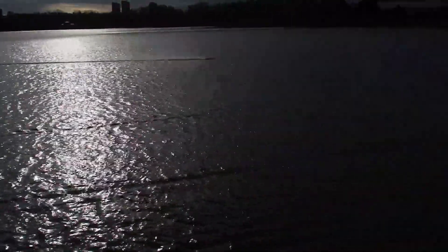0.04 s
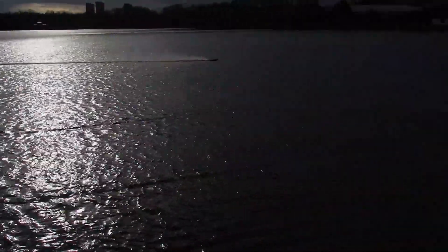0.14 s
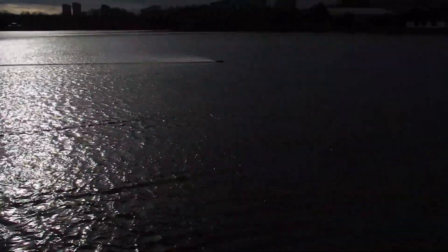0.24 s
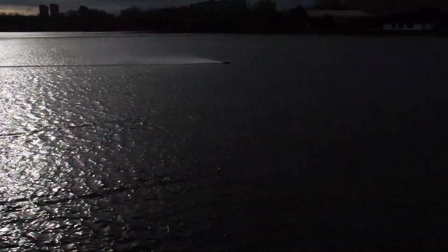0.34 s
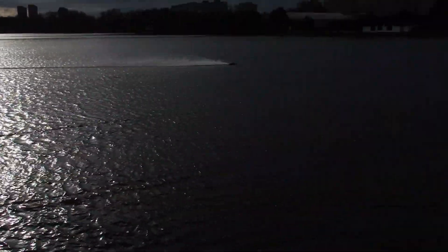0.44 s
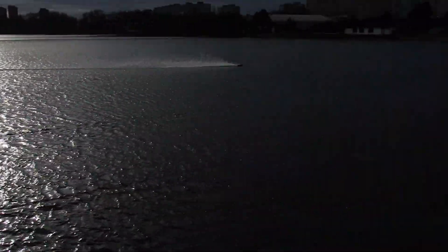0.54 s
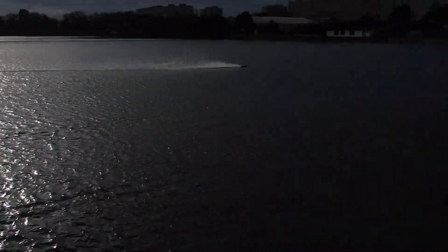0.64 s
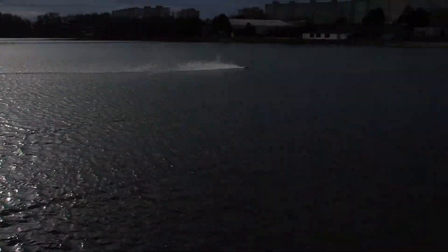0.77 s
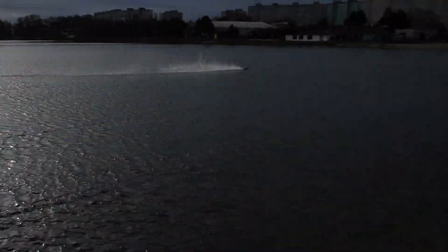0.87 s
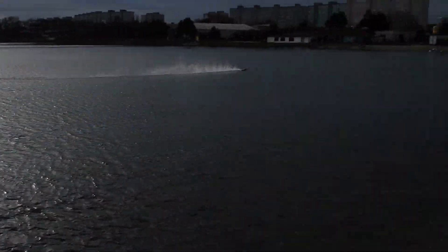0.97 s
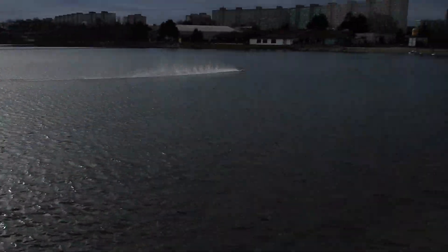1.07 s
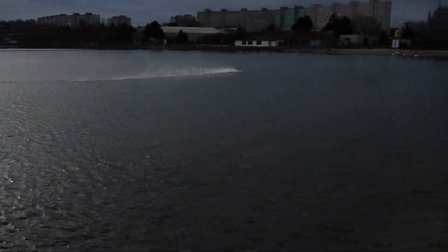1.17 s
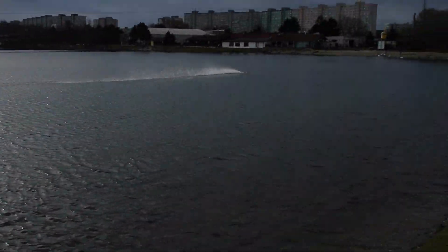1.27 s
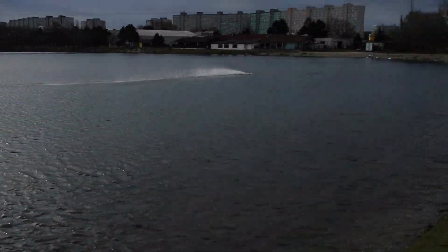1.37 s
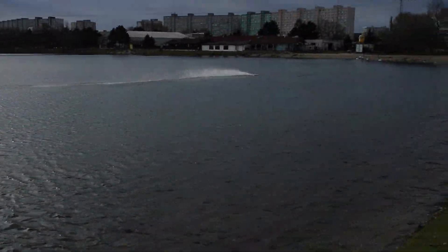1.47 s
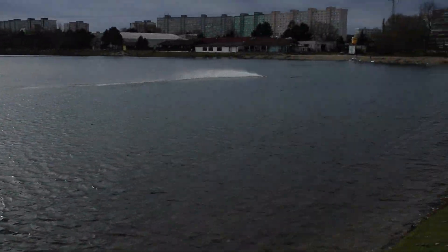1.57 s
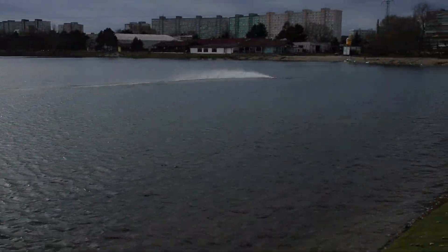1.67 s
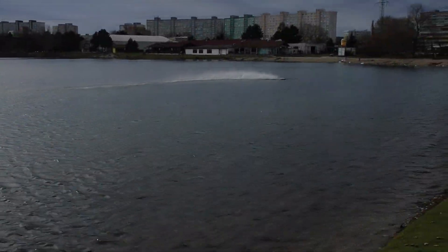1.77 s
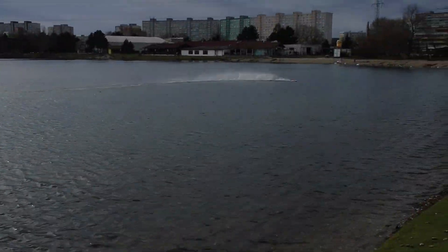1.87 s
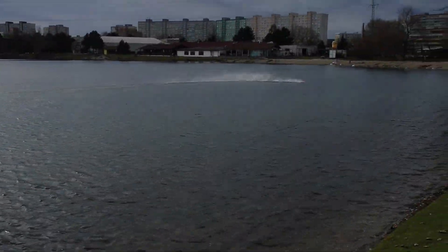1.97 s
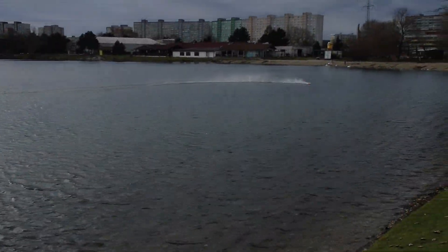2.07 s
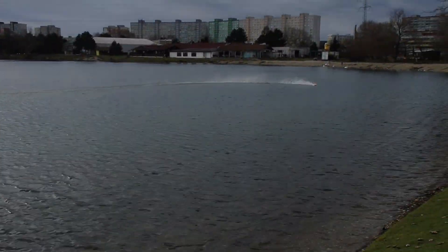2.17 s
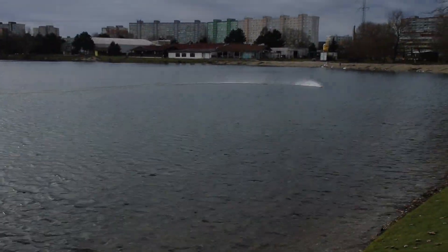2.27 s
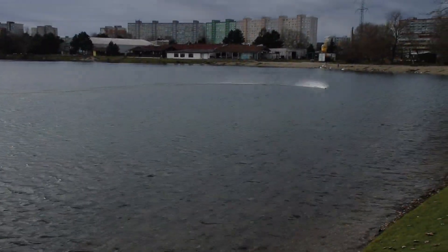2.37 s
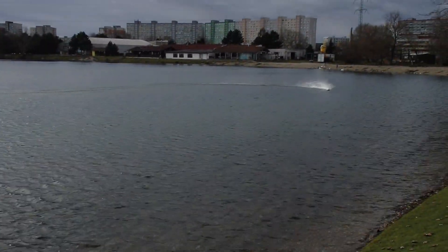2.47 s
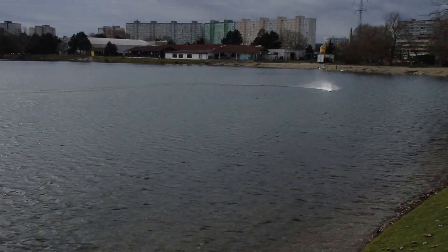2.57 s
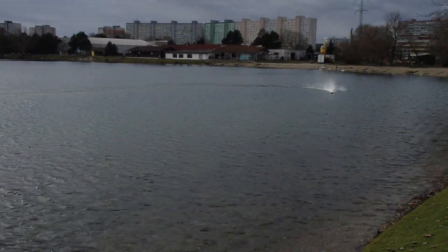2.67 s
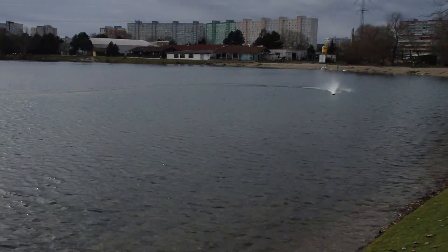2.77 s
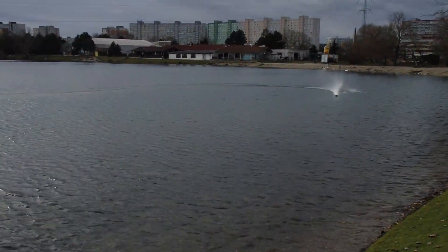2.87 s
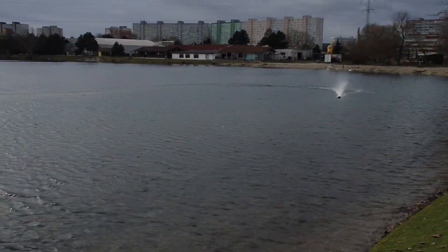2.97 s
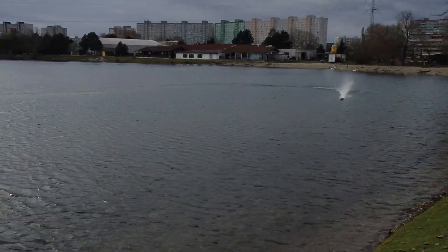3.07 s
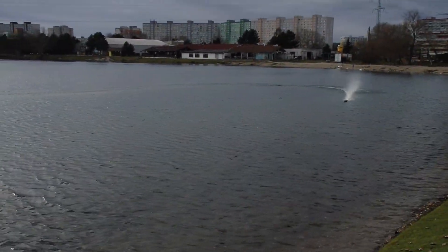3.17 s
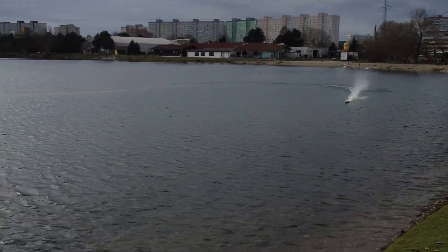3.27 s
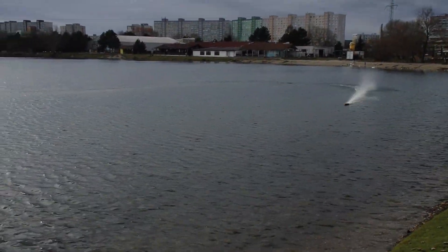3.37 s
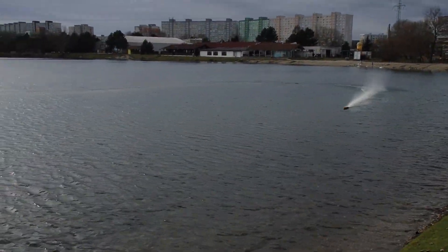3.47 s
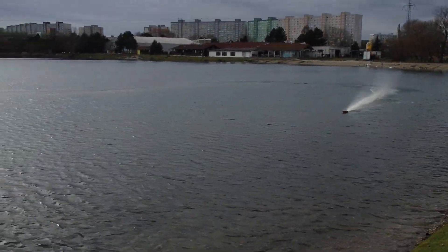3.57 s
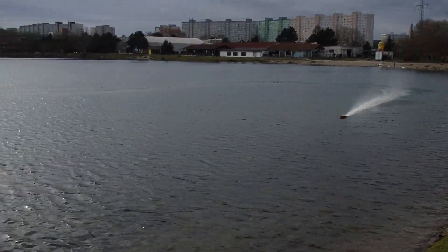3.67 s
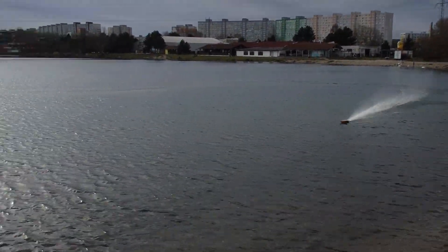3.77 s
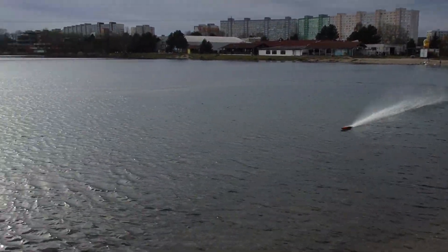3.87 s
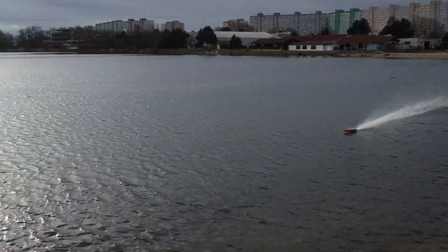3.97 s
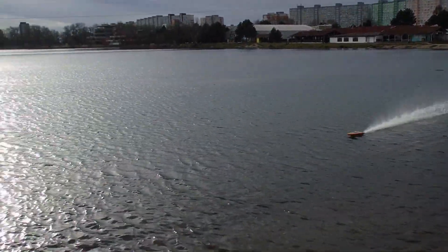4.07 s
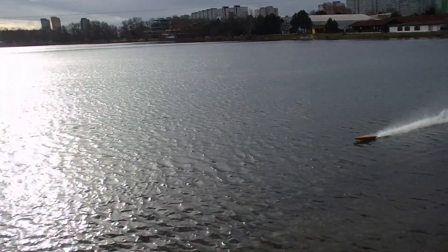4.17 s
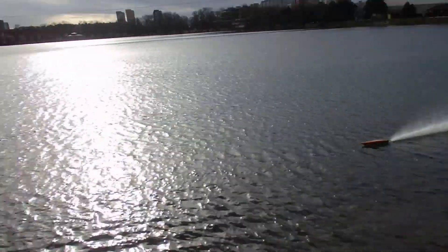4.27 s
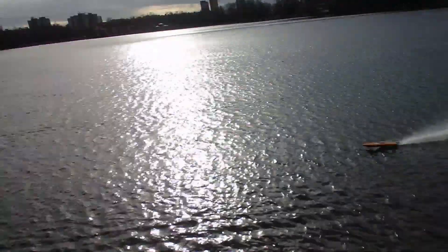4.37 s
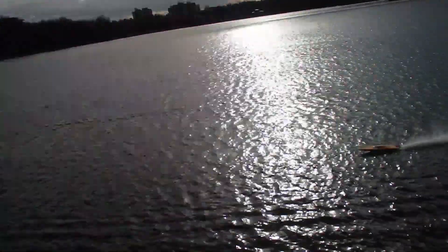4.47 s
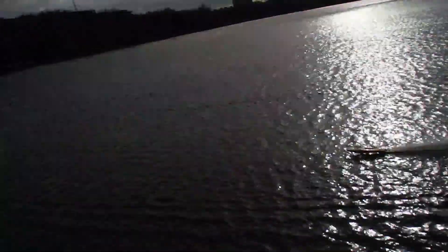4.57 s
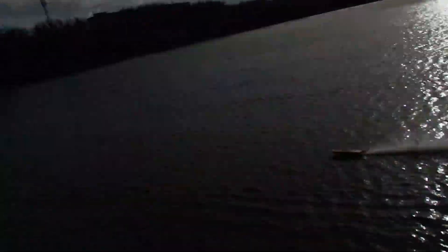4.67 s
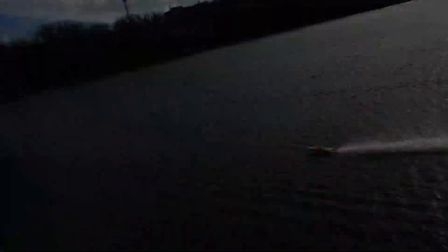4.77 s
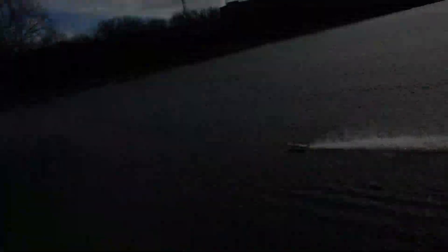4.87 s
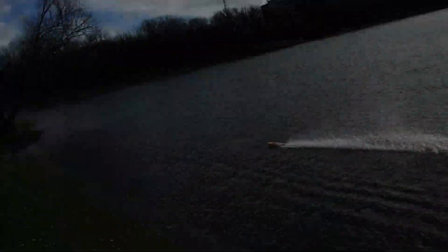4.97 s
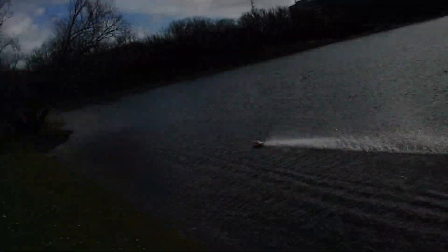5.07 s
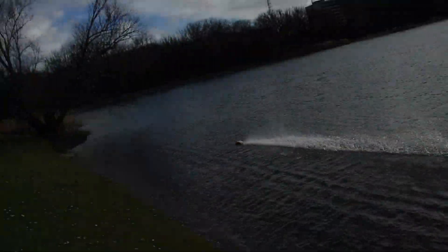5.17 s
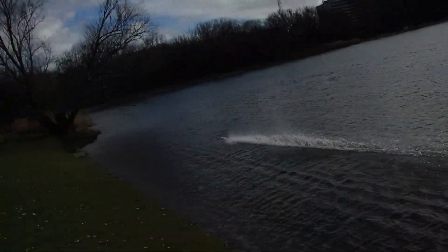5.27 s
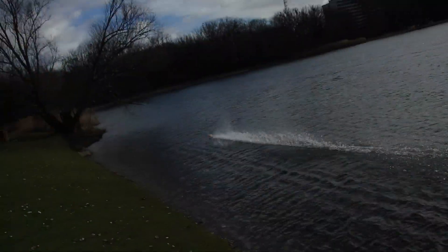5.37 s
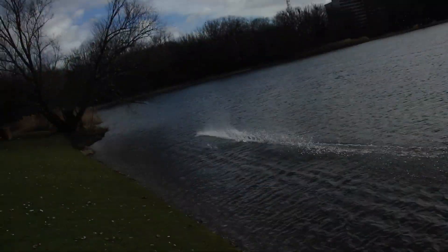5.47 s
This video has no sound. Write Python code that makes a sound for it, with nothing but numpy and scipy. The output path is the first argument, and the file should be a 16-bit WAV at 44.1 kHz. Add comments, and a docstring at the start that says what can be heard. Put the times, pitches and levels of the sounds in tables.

```python
"""An electric model speedboat crosses a lake, throttles back for a turn, then races past near the shore.
Its two-bladed surface propeller whines at harmonics of the blade rate, clean while it bites and ragged
when the hull skips. The strokes fling up a hissing tail of spray, and the banks return faint echoes.
A turbulent breeze bumps the two microphone ports, of which the right is muffled, over a soft hiss."""
import sys
import numpy as np
from scipy import signal
from scipy.fft import rfft, irfft
from scipy.io import wavfile
from scipy.ndimage import uniform_filter1d, minimum_filter1d

SR = 44100
rng = np.random.default_rng(int(sys.argv[2]) if len(sys.argv) > 2 else 0)


def materialize(psi):
    """Save the field psi as 16-bit PCM at rate SR to the path in sys.argv[1].

    A 1-D psi becomes a single channel; in a 2-D psi each row is a channel.
    """
    bounded = np.clip(np.atleast_2d(psi).T, -1, 1)
    quanta = np.round(bounded * 32767).astype(np.int16)
    wavfile.write(sys.argv[1], SR, quanta)


N = 243431
TIME = np.arange(N) / SR
FREQS = np.arange(N // 2 + 1) * SR / N

# Blade strokes per second, Doppler shift included: (time [s], rate [Hz])
BLADE_RATE = [(0, 995), (.45, 958), (.8, 925), (1.05, 917), (1.22, 930), (1.5, 920), (1.92, 914),
              (1.99, 966), (2.025, 958), (2.05, 765), (2.17, 535), (2.33, 527), (2.42, 596), (2.48, 735),
              (2.6, 880), (2.7, 932), (3.25, 985), (3.33, 1008), (3.55, 1004), (3.85, 1015), (4.45, 1017),
              (4.55, 1001), (4.66, 1002), (4.75, 972), (4.85, 967), (5.02, 936), (5.12, 938), (5.25, 923),
              (5.52, 921)]
# Odd shaft harmonics from unequal blades: (multiple of shaft rate [1], relative level [dB])
IMBALANCE_TONES = [(1, -17), (3, 0), (5, -1), (7, -10), (11, -11)]
# Loudness of the boat as it runs out, turns and passes close: (time [s], level [dB])
NEARNESS = [(0, -35.5), (.3, -38.5), (.85, -41.5), (1.6, -42), (2.3, -46), (2.8, -46), (3.25, -42),
            (3.7, -37), (4.1, -32.5), (4.4, -26), (4.63, -25), (4.9, -25), (5.25, -27), (5.52, -31)]
# Side the boat shows, 0 bow, 90 abeam, 180 stern: (time [s], angle [deg])
HEADING = [(0, 144), (1, 155), (1.7, 180), (2.05, 175), (2.5, 98), (3, -3), (3.5, 20), (4.2, 54),
           (4.62, 100.5), (4.9, 135.5), (5.52, 128)]
# Radiation of the whine: (angle [deg], blade tones 1 to 6 [dB each], imbalance tones [dB])
DIRECTIVITY = [(0, 9, 3, -10, -5, -1, -2, -1.5), (30.06, 6.5, 9, -6, -12, -3.5, -7.5, -6.5),
               (87.8, 9.5, 1.5, -3.5, -10, -9, -29, -4), (136.8, 4.5, 1, 6, -5.5, -5.5, -16, -12),
               (154.8, 1, 3.5, -8, -7.5, -10, -9, -7), (176, 9, 1.6, -8.5, -12, -14, -13, -7)]
# From astern the whine comes ragged through the spray: (angle [deg], roughness [0-1])
ROUGHNESS = [(0, .12), (40, .06), (90, .06), (132, .08), (142, .33), (180, .42)]
# The propeller slams into a ripple or skips clear: (time [s], swell or dip [dB], Gaussian width [s])
SLAMS = [(0.909, 6.5, 0.0057), (0.946, 8, 0.0032), (0.972, -3, 0.003), (0.976, 13.5, 0.0021),
         (0.991, 7, 0.0073), (1.068, 1, 0.0045), (1.909, 5, 0.0077), (1.98, 6, 0.0039),
         (1.997, 6.5, 0.0045), (2.014, -14, 0.0048), (2.024, 8, 0.0029), (2.101, 14, 0.0071),
         (3.299, 3.5, .012), (3.34, -6, 0.0081), (4.71, -1.5, 0.0072), (4.723, 10.5, 0.0044),
         (4.746, -9, 0.004)]
# The hull skips: (time [s], length [s], spray [dB], wash [dB], whine [dB],
# brightening [dB per blade tone], air drawn in [0-1])
SKIPS = [(-.012, 0.029, -0.5, 6.4, -2.5, 3, 0.46), (0.11, .064, 2, 5, -1.5, 2.5, .05),
         (0.329, 0.055, 4, 1.7, -1, -0.5, 0.19), (0.447, 0.13, 1.5, 4.5, 7, 1.5, 0.33),
         (0.604, .168, 5.5, 6.5, 8.5, 2, .5), (0.909, 0.167, 4, 5.5, 6.5, -0.5, .2),
         (1.16, 0.075, 2.5, 2, 7, 3.5, 0), (1.272, .06, 4.5, -1, 0.5, 8, 0.12),
         (1.351, 0.0901, 2.5, 2.5, 3, 7, .45), (1.452, 0.032, 4, -1.5, 3, 6.5, 0.31),
         (1.965, 0.07, 2.9, 2, 1.5, -2, 0.16), (2.169, .03, 3.5, 6.5, 3, 16, .45),
         (2.461, .065, 2, -1, 4.5, 4, 0.11), (2.556, .06, 2.5, 2.5, 1.5, 0.5, .2),
         (2.711, 0.017, 8, 7.5, 3.5, 5, .55), (2.838, 0.0082, 12, 5, -1, -5, 0.09),
         (2.869, .014, 7.5, 3, 0, -6, .1), (2.95, 0.14, 4.5, 0.5, 0.5, -1.5, 0.05),
         (3.285, 0.042, 5, 1.5, 3, 5, 0.37), (3.35, 0.036, 8.5, 3.5, 1, 2.5, 0.18),
         (3.451, 0.077, 5.5, 2, 1, -0.5, 0.01), (3.621, 0.071, 2.5, -2.5, .5, 0, .02),
         (3.788, 0.045, 4.5, 5, -1, 1.5, 0.09), (4.0, 0.068, 3.5, 5, 1, 0.5, 0.03),
         (4.184, 0.1, 6, 4.7, 1.5, 5, 0.29), (4.381, 0.09, 5.5, 5, 1, 2, 0.08),
         (4.568, .11, 6.5, 6.5, 5, -.5, 0.05), (4.773, 0.109, 6, 4.5, -1, 2, .25),
         (5.004, 0.0559, 6, 6, -3.5, .5, 0.49), (5.08, .06, 4.5, 4, 0, 3.5, 0.07),
         (5.27, 0.063, 4.2, 4, -9.5, 1, 0.63), (5.351, 0.07, 5, 1.5, 0.5, 3, .3),
         (5.49, .04, 6.5, 3, -1.5, -0.5, 0.4)]
# Spectrum of the wash: (frequency [Hz], relative density [dB])
WASH_SPECTRUM = [(150, -32), (350, -14.5), (600, -8), (850, -11), (1100, -0.5), (1300, -2.5), (1600, 1),
                 (2000, 3.5), (2700, 0), (3300, -7.5), (4200, -10.5), (7000, -50)]
# Spectrum of the spray: (frequency [Hz], relative density [dB])
SPRAY_SPECTRUM = [(1500, -18), (3000, 3), (3700, -5), (4400, -2.5), (5100, 4), (5800, 0.5), (6500, -4.5),
                  (7400, -8), (8500, -21), (9600, -10.5), (10500, -17.5), (11800, -33), (13000, -29),
                  (14500, -33)]
# Reflections from the banks: (delay [s], level [dB])
ECHOES = [(.047, -31), (0.111, -27), (.21, -26)]
# How the two ports hear the boat: (frequency [Hz], left minus right [dB], phase lead of left [rad])
PORT_RESPONSE = [(99, 8.5, 2), (546, -10, 0.18), (950, -1, 0.75), (2030, -.3, 0.53), (2800, -3, 1),
                 (3300, 0, 1.61), (4120, 9, 2), (4920, 23, 1), (5000, 31, -4), (6940, 8.5, 15.5),
                 (7340, 17, -66), (7250, 17, 31), (9800, 18, -2), (12000, 1.5, -2), (14500, 5, -1.6)]
# Steady breeze on the ports: (time [s], level [dB])
BREEZE_LEVEL = [(0, -44.5), (.95, -43.5), (1.15, -48.5), (2.3, -47), (2.7, -50), (4.4, -52.5), (5.52, -47)]
# Spectrum of the turbulence: (frequency [Hz], relative density [dB])
BREEZE_SPECTRUM = [(20, -30), (45, -7), (80, 1), (130, 3), (230, 2.5), (350, 1), (550, -2), (1000, -24),
                   (2500, -60)]
# Eddies thump the ports: (time [s], level [dB], left minus right [dB], Gaussian width [s], bass [dB])
EDDIES = [(0.253, -38.5, 13, .016, -5), (.311, -36.5, -18, .007, -3), (0.359, -30, 21, 0.0086, -12),
          (.65, -42.5, 3, 0.057, 2), (0.754, -43, -7, 0.039, -2), (1.384, -32.5, -2, 0.006, -6),
          (1.38, -43, -18, 0.069, 5), (1.446, -26, 2, 0.0035, -4), (1.73, -48, -26, 0.053, 13.5),
          (3.215, -51, -35, 0.0097, 17), (3.322, -54, -14, 0.023, 10), (4.652, -25.5, -4, 0.011, -3),
          (4.675, -26, 9, .016, -9), (4.78, -31.5, -7, .05, -5), (4.902, -30.5, 4, 0.034, -4),
          (5.058, -32, -5, 0.024, -6), (5.329, -42, 15, 0.038, -8)]
# Open air and microphone hiss: (frequency [Hz], relative density [dB])
AIR_SPECTRUM = [(40, -8), (120, -11), (500, 3), (1000, 11), (2500, -35), (5000, -9), (9000, -9),
                (15000, -10)]

SHUT_AT_S, SHUT_S, REOPEN_AT_S, REOPEN_S, IDLE_DB = 2.055, 0.0086, 2.27, 0.34, -15
SLIP_DB, FULL_SLIP_HZ_PER_S, SLIP_FIRST_SHARE = 8, 1100, 0.2
SKIP_ATTACK_S, SKIP_RELEASE_S = 0.022, 0.02
UPPER_BITE_SHARE = 0.38   # share of a skip's swell that the upper tones follow
RACE_HZ = 28.06   # rise of the blade rate with the propeller all in air
SPRAY_DB, WASH_DB, WASH_NEARNESS_SHARE = 0.86, -8.5, 0.7
EDDY_BASS_HZ, CUTOFF_HZ = 111, 15400


def propeller(shaft_phase, rough, level_db, bite_db, bright_db):
    """Periodic forcing: two strokes a turn give even shaft harmonics; unequal blades add odd ones."""
    radiated_db = level_db + np.array(by_heading(DIRECTIVITY))
    first_db, second_db, third_db, fourth_db, fifth_db, sixth_db, odd_db = radiated_db
    slap_db = bite_db + (0.66 + 2.24 * rough) * drift(17)   # ripples change how deep the blades dip
    for at, db, width in SLAMS:
        slap_db += db * np.exp(-0.5 * ((TIME - at) / width) ** 2)
    slip_db = blade_slip()
    first_db += slap_db - bright_db - SLIP_FIRST_SHARE * slip_db
    second_db += slap_db + slip_db
    third_db += slap_db + bright_db
    whine = from_db(first_db) * tone(2 * shaft_phase, 0.13 + 0.69 * rough, width_hz=99, rise_hz=18)
    whine += from_db(second_db) * tone(4 * shaft_phase, 1.9 * rough, width_hz=68, rise_hz=8)
    whine += from_db(third_db) * tone(6 * shaft_phase, 1.54 * rough, width_hz=46)
    upper_db = [fourth_db, fifth_db, sixth_db, sixth_db - 9, sixth_db - 16]
    for order, db in zip([8, 10, 12, 14, 16], upper_db):
        gain = from_db(db + UPPER_BITE_SHARE * bite_db + 2.65 * drift(10))
        whine += gain * tone(order * shaft_phase, 0.26 + 0.63 * rough, width_hz=39)
    for order, db in IMBALANCE_TONES:
        gain = from_db(odd_db + db - 0.3 + 4.1 * drift(10))
        whine += gain * tone(order * shaft_phase, 0.18, width_hz=110)
    return whine


def tone(phase, rough, width_hz, rise_hz=0):
    """Random modulation: uneven strokes move a share of a tone's power into sidebands."""
    sidebands = rms_one(drift(width_hz) + 1j * drift(width_hz))
    sidebands *= np.exp(2j * np.pi * rise_hz * TIME)   # a little sharp where the blades slip
    share = np.clip(rough, 0, 1)
    envelope = np.sqrt(1 - share) + np.sqrt(share) * sidebands
    wander = 2 * drift(0.42)   # the phase turns slowly, at random
    return np.sqrt(2) * np.real(envelope * np.exp(1j * (phase + wander)))


def blade_slip():
    """Slip grows with the shaft's change of speed and lifts the second tone [dB]; none at idle."""
    blade_hz, = in_time(BLADE_RATE)
    change_hz_per_s = uniform_filter1d(np.abs(np.gradient(blade_hz)) * SR, size=1000)
    return SLIP_DB * np.minimum(change_hz_per_s / FULL_SLIP_HZ_PER_S, 1) * (1 - throttle_closure())


def throttle_closure():
    """Loss of drive [0-1]: the throttle shuts quickly for the turn, then opens gradually."""
    closing = np.clip((TIME - SHUT_AT_S) / SHUT_S, 0, 1)
    reopening = np.clip((TIME - REOPEN_AT_S) / REOPEN_S, 0, 1)
    return closing - reopening


def hull_skips():
    """Ventilation: at each skip water surges and the propeller draws air, which alters its bite."""
    curves = np.zeros((5, N))
    for at, length, *effects in SKIPS:
        attack = np.clip((TIME - at) / SKIP_ATTACK_S + 0.5, 0, 1)
        release = np.exp(-np.clip((TIME - at - length) / SKIP_RELEASE_S, 0, 20))
        curves += np.outer(effects, attack * release)
    return curves


def water(shaft_phase, wash_db, spray_db):
    """Modulated noise: each stroke flings water, sheets of it flutter and drops crackle on the lake."""
    strokes = 1 + 0.5 * np.cos(2 * shaft_phase)
    flutter_db = 1.61 * drift(40)
    wash = coloured(rng.standard_normal(N) * strokes, WASH_SPECTRUM)
    impacts = (rng.random(N) < 3500 / SR) * rng.choice([-1, 1], N)   # about 3500 drops a second
    drops = impacts * from_db(3.8 * np.minimum(rng.exponential(1, N), 5))
    puffs = rms_one(rng.standard_normal(N) * strokes)
    spray = coloured(puffs + 0.5 * rms_one(drops), SPRAY_SPECTRUM)
    mist = rms_one(filtered(rng.standard_normal(N), "band", [6300, 9300], order=2))
    mist_db = spray_db - 9.5 + 0.45 * (spray_db - spray_db.max())   # carries only from close by
    return (from_db(wash_db + 0.1 + flutter_db) * wash
            + from_db(spray_db + 0.53 + flutter_db) * spray
            + from_db(mist_db + 2.8 * drift(64)) * mist)


def banks(direct):
    """Reflection: the shore adds faint, dull, delayed copies to the direct sound."""
    dull = filtered(direct, "low", 3000)
    return direct + sum(from_db(db) * np.interp(TIME - delay, TIME, dull, left=0) for delay, db in ECHOES)


def ports(x):
    """Level and phase differences: the right port loses treble; the mean of the two keeps the level."""
    balance_db, lead = in_frequency(PORT_RESPONSE)
    response = pan(balance_db) * np.exp(1j * np.array([0 * lead, -lead]))
    return irfft(rfft(x) * response / np.abs(response.mean(axis=0)), N)


def breeze():
    """Turbulence: pressure fluctuates separately at each port, with harder eddies, deep or papery."""
    upper_gain = bass_gain = from_db(in_time(BREEZE_LEVEL)[0])
    for at, db, balance_db, width, bass_db in EDDIES:
        pulse = np.exp(-0.5 * np.minimum(((TIME - at) / width) ** 2, 100))
        eddy = from_db(db) * pan(balance_db)[:, None] * pulse
        upper_gain = upper_gain + eddy
        bass_gain = bass_gain + from_db(bass_db) * eddy
    lumps = [rng.standard_normal(N) * from_db(2.3 * drift(53)) for port in range(2)]
    pressure = np.array([coloured(noise, BREEZE_SPECTRUM) for noise in lumps])
    bass = irfft(rfft(pressure) / (1 + (FREQS / EDDY_BASS_HZ) ** 4), N)
    return upper_gain * (pressure - bass) + bass_gain * bass


def air():
    """Stationary noise: a soft hiss, and a faint rumble that leans to the right port."""
    hiss = np.array([coloured(rng.standard_normal(N), AIR_SPECTRUM) for port in range(2)])
    rumble = rms_one(filtered(rng.standard_normal((2, N)), "band", [45, 130], order=2))
    return from_db(-44) * hiss + from_db(-60) * pan(-9)[:, None] * rumble


def from_db(db):
    """Amplitude ratio for a level in decibels."""
    return 10 ** (np.asarray(db) / 20)


def rms_one(x):
    """Normalisation to unit power."""
    return x / np.sqrt(np.mean(np.abs(x) ** 2) + 1e-20)


def in_time(rows):
    """Linear interpolation of each column at every sample."""
    times, *columns = np.transpose(rows)
    return [np.interp(TIME, times, column) for column in columns]


def by_heading(rows):
    """Directivity: each column at the angle the boat shows at every sample."""
    degrees, *columns = np.transpose(rows)
    return [np.interp(in_time(HEADING)[0], degrees, column) for column in columns]


def in_frequency(rows):
    """Interpolation of each column on a logarithmic frequency axis."""
    hz, *columns = np.transpose(rows)
    return [np.interp(np.log(FREQS + 1), np.log(hz), column) for column in columns]


def coloured(x, spectrum):
    """Spectral shaping, at unit power."""
    return rms_one(irfft(rfft(x) * from_db(in_frequency(spectrum)[0]), N))


def filtered(x, kind, hz, order=1):
    """Filtering with a maximally flat passband."""
    return signal.sosfilt(signal.butter(order, hz, kind, fs=SR, output="sos"), x)


def drift(rate_hz):
    """Random fluctuation of unit power, mostly slower than the given rate."""
    return rms_one(irfft(rfft(rng.standard_normal(N)) / (1 + (FREQS / rate_hz) ** 2), N))


def pan(db):
    """Constant-power left and right gains for a level difference."""
    gains = from_db(np.array([db, -db]) / 2)
    return gains / np.sqrt(np.mean(gains ** 2, axis=0))


def scene():
    """Superposition: one shaft drives whine and spray, which join breeze and air at the ports."""
    near_db, = in_time(NEARNESS)
    spray_surge_db, wash_surge_db, bite_db, bright_db, air_drawn = hull_skips()
    rough = np.clip(by_heading(ROUGHNESS)[0] + air_drawn, 0, 1)
    blade_hz = in_time(BLADE_RATE)[0] + RACE_HZ * air_drawn
    jitter = (0.0007 + 0.006 * rough) * drift(25)
    shaft_phase = np.pi * np.cumsum(blade_hz * (1 + jitter)) / SR   # half a turn per stroke
    boat = propeller(shaft_phase, rough, near_db + IDLE_DB * throttle_closure(), bite_db, bright_db)
    wash_db = WASH_DB + WASH_NEARNESS_SHARE * near_db + wash_surge_db
    spray_db = SPRAY_DB + near_db + spray_surge_db
    boat += water(shaft_phase, wash_db, spray_db)
    left, right = ports(banks(boat)) + breeze() + air()
    return np.array([filtered(left, "high", 110), right])   # the left port is thin in the bass


def record(dry):
    """Peak and band limiting: the gain dips round peaks above full scale; the top treble is cut."""
    headroom = np.minimum(1, 1 / (np.abs(dry).max(axis=0) + 1e-9))
    gain = uniform_filter1d(minimum_filter1d(headroom, size=129), size=129)
    return irfft(rfft(dry * gain) / np.sqrt(1 + (FREQS / CUTOFF_HZ) ** 200), N)


dry = scene()
out = record(dry)
materialize(out)
```